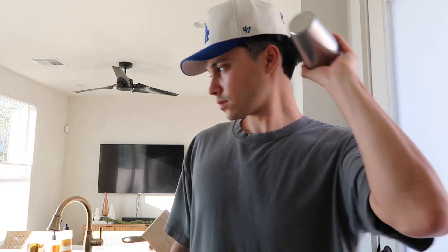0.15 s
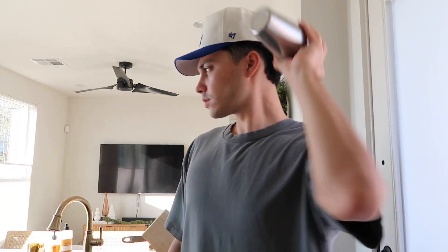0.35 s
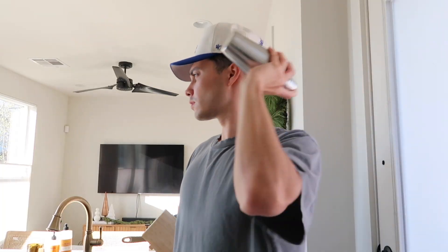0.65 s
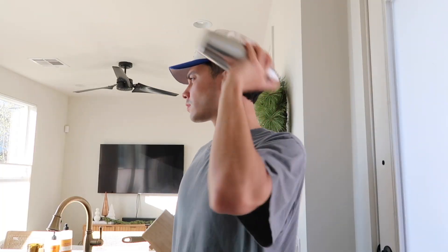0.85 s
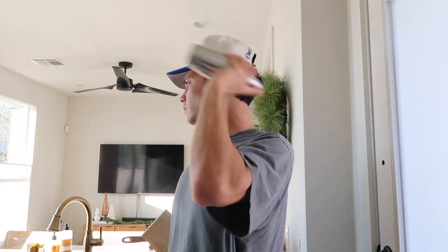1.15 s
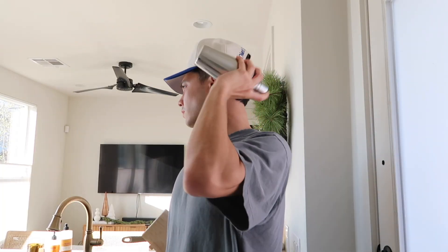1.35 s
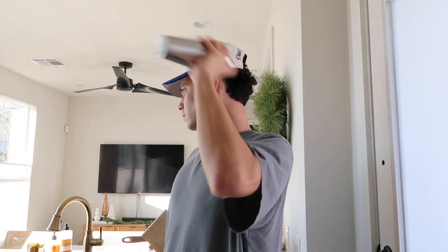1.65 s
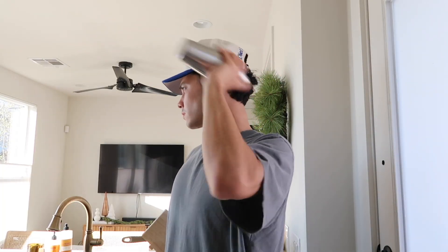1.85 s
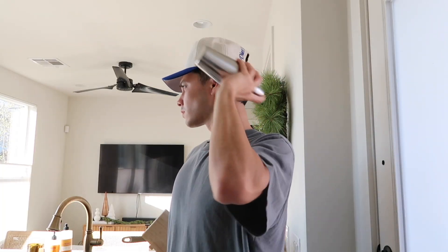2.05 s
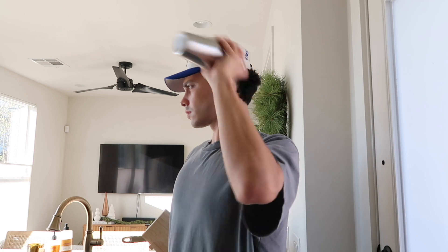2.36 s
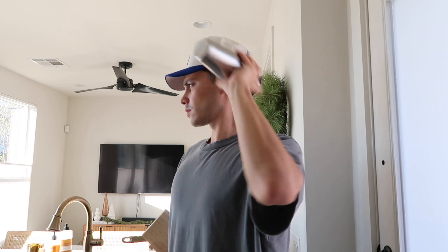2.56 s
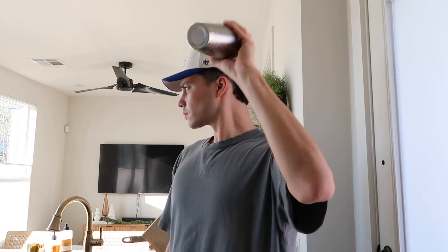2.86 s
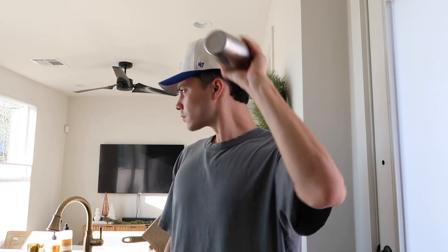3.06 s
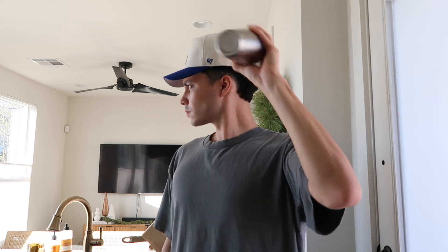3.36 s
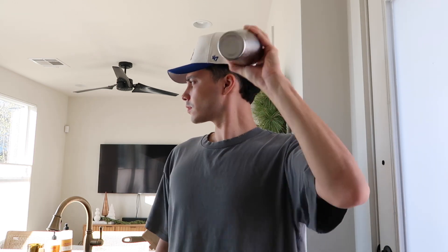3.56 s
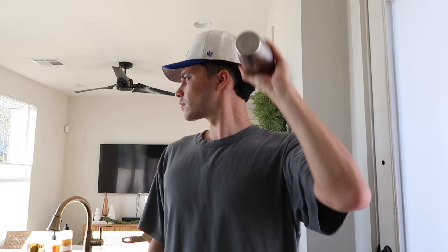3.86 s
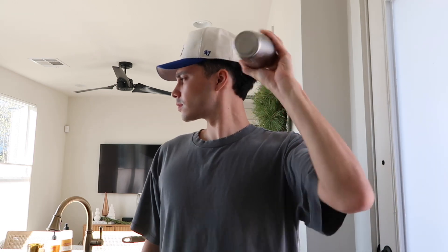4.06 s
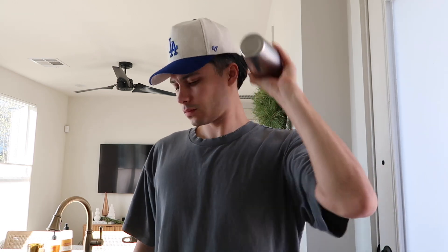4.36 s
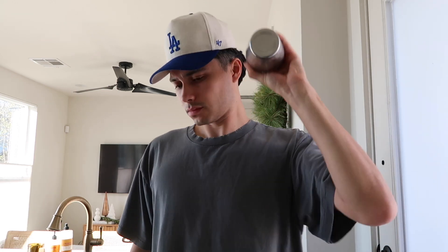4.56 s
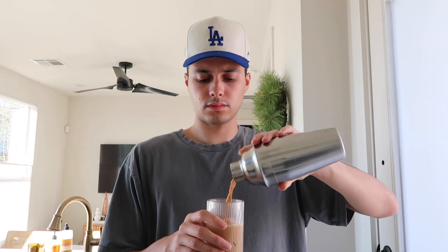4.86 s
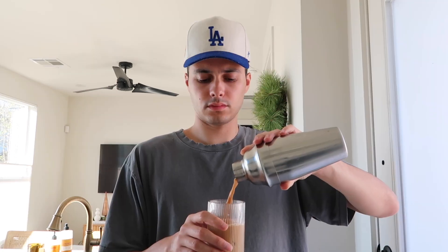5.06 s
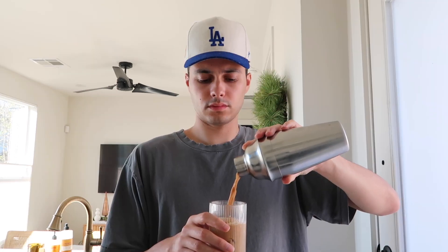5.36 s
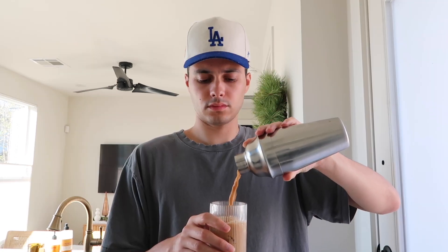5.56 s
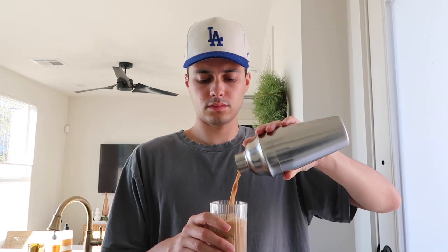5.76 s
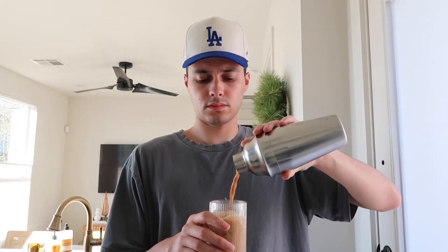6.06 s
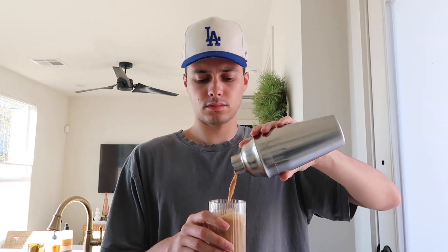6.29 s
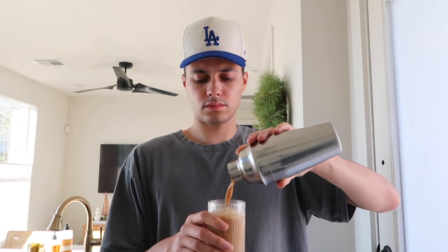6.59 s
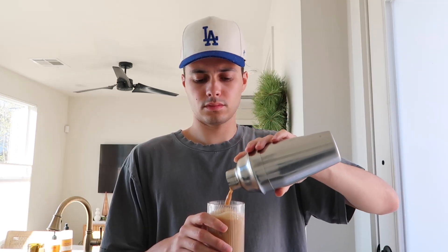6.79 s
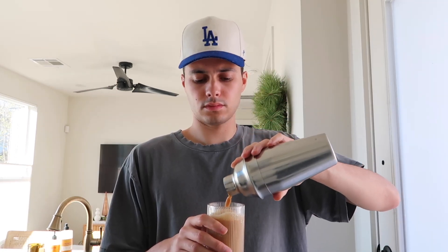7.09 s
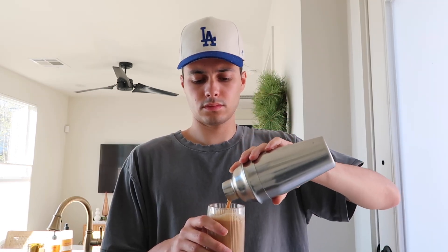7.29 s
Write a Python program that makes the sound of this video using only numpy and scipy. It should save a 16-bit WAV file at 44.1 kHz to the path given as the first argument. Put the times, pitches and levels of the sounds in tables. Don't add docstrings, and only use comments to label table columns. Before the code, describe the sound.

From 0 to about 4.67 seconds, ice cubes are shaken hard in a hand-held steel shaker close to a stereo microphone. Some eight throws a second give alternating bursts of dense, bright rattle, with sharp knocks, dry cube cracks and quick taps; the metal rings only briefly under the hand. It starts slightly gentler, is wildest around 1.5 to 2 seconds, then stays steady, with a heavy knock near 4.4. At 4.67 it cuts abruptly to a much quieter pour. A bubbly trickle runs into a glass, fullest around 6 to 6.3 seconds, while cubes shift and clink in the tilted shaker, notably at 5.1 and 6.2, with slightly longer ringing. Tiny splashes sparkle near 5.8. After 6.6 the stream thins to a dribble, with soft drips from 6.96 to 7.4. Short kitchen reflections, fan wash, low fridge hum and a very faint high whine lie behind.

```python
import sys
import numpy as np
from scipy import signal
from scipy.fft import rfft, irfft, next_fast_len
from scipy.io import wavfile
from scipy.ndimage import uniform_filter1d

SR = 44100
rng = np.random.default_rng(int(sys.argv[2]) if len(sys.argv) > 2 else 0)


def log_audio(samples):
    frames = np.atleast_2d(samples).T
    limited = np.clip(frames, -1, 1)
    pcm = np.round(limited * 32767).astype(np.int16)
    wavfile.write(sys.argv[1], SR, pcm)


def gain_from_db(level_db):
    decades = np.asarray(level_db, float) / 20
    return 10 ** decades


N = 327699
T = np.arange(N) / SR
CHANGE_S = 4.668


def shaking():
    # (frequency [Hz], density [dB per Hz])
    rattle_tone = [(130, -59), (320, -43), (420, -15.5), (687, -10), (930, -12), (1400, -15), (1740, -3),
                   (2230, -6.5), (2810, -10.5), (3660, -6), (5230, -16.5), (12500, -34.5), (15500, -39)]
    # (time [s], peak [dB], pitch [Hz], sharp tick against it [dB])
    body_knocks = [(.1236, -3.5, 2103, -13.5), (.3382, -4.5, 2130, -16.5), (.3872, -4, 2436, -33.5),
                   (.6183, -18, 1810, -17), (.8918, -25, 2300, -14.5), (.9029, -5, 2250, -22),
                   (1.1064, -1.5, 2210, -33), (1.1355, -7, 2130, -29.5), (1.3755, -7.5, 1660, -4.5),
                   (1.6168, -2.5, 1870, -30), (1.7151, -2, 1840, -9.5), (1.7362, -1.5, 1960, -19),
                   (1.8341, 2.5, 2110, -19), (2.3188, -0.5, 2270, -21), (2.5467, -8.5, 1950, -24),
                   (2.7609, 0.5, 2100, -17), (2.9812, -2, 2300, -9.5), (2.9837, -8.5, 2390, 2),
                   (3.1999, -2, 2480, -24), (3.2086, -4, 2000, -15), (3.4533, -9, 2370, -27),
                   (3.4672, -9, 2410, -29), (3.6695, -7, 1990, -21), (3.6925, -3, 2140, -29.5),
                   (3.9854, -2, 2474, -6), (4.1712, -5.5, 2680, -5.5), (4.1888, -11, 2200, -29),
                   (4.2632, -4, 2044, -14), (4.3901, 7.5, 2170, -13), (4.3934, 2, 3700, -14.5)]
    # (time [s], peak [dB], pitch [Hz], sharp tick against it [dB])
    cap_knocks = [(0.2642, -12.5, 3510, -3), (.482, -9, 3610, -30.5), (0.505, -12.5, 3300, -29.5),
                  (.7137, -2.5, 3470, -33.5), (.8808, -10, 3100, -31.5), (.998, -3.5, 3220, -6),
                  (1.0043, -5, 3810, -24.5), (1.2826, -5.5, 3420, -25), (1.4605, -8, 3500, -7.5),
                  (1.6131, -0.5, 3700, -34), (1.8434, 0, 3650, -24.5), (1.9201, -3, 4270, -24),
                  (1.936, -24, 3730, -24), (1.941, -6, 3380, -22), (2.178, -6, 3500, -30.5),
                  (2.31, -7, 3280, -6), (2.3535, -1.5, 3650, -10), (2.4054, -5.5, 3270, -28.5),
                  (2.6094, -6, 3660, -26.5), (2.758, -9.5, 1770, -14), (3.087, 0.5, 3460, -31.5),
                  (3.144, -6.5, 3860, -20), (3.279, -9, 3200, -32.5), (3.5525, -11, 3520, 0.5),
                  (3.767, -11, 2870, 3), (4.0194, -5.5, 3460, -10), (4.177, -14, 3630, -21),
                  (4.268, -6, 3270, -7), (4.5221, -10, 5240, -21), (4.6322, -22, 3550, -18.5)]
    # (time [s], peak [dB], pitch [Hz])
    cracks = [(0.0179, -13.5, 1855), (0.1385, -12.5, 2080), (0.181, -15.5, 2180), (0.3733, -16, 2210),
              (0.4905, -25, 2120), (0.637, -13, 1795), (0.6918, -12.5, 3520), (0.719, -8, 3600),
              (1.5896, 0.5, 2160), (1.709, -7, 1850), (1.8023, -1.5, 1940), (2.0277, -26.5, 2200),
              (2.0702, -6.5, 2180), (2.246, -6, 2060), (2.2707, -11, 2100), (2.3583, -24, 2240),
              (2.8404, -14.5, 1830), (2.8895, -5, 1830), (3.0079, -4.5, 2167), (3.442, -12.5, 2160),
              (3.5857, -4, 2150), (3.7324, -13, 2140), (3.8955, -6, 2610), (3.9094, -8, 1250),
              (4.155, -8, 2310), (4.4462, -10, 2000), (4.6214, -13, 3790)]
    # (time [s], peak [dB], pitch
    # [Hz])
    corner_taps = [(0.0464, -12, 3580), (0.057, -28, 3610), (0.1424, -7.5, 2250), (0.1611, -18, 1940),
                   (0.1828, -11.5, 1984), (0.185, -13, 1970), (0.243, -21, 3270), (0.2549, -17, 3550),
                   (0.3382, -22, 2140), (0.3605, -9.5, 3780), (0.3637, -13.5, 2200), (0.3742, -8.5, 2110),
                   (0.4039, -8, 3770), (0.4914, -13, 2330), (0.5186, -16, 3620), (0.597, -20.5, 1654),
                   (0.6182, -12.5, 1980), (0.6506, -12.5, 2370), (0.6702, -10, 3400), (0.6944, -13, 3500),
                   (0.719, -4.5, 3580), (0.7447, -12.5, 3370), (0.76, -14, 1870), (0.7918, -11.5, 3120),
                   (0.8153, -26.5, 2220), (0.8806, -10, 3310), (0.8911, -5, 2360), (0.9044, -20, 2030),
                   (0.927, -10.5, 1960), (0.99, -11, 3480), (1.0504, -8.5, 3460), (1.0536, -12.5, 3660),
                   (1.0592, -14, 2230), (1.098, -9.5, 2240), (1.1347, -3, 2080), (1.3146, -18, 3110),
                   (1.3388, -17, 4100), (1.3557, -13, 2024), (1.3792, -15, 2110), (1.4553, -8.5, 2180),
                   (1.462, -2, 3860), (1.5694, -12, 1740), (1.6801, -9, 3190), (1.89, -18.5, 1830),
                   (1.913, -9, 3700), (1.914, -8, 4230), (1.9354, -3, 3540), (1.9607, -26, 3520),
                   (2.0275, -7.5, 2290), (2.0292, -11.5, 2120), (2.072, -6.5, 3640), (2.162, -14, 3700),
                   (2.2536, -7.5, 3310), (2.2726, -6.5, 2130), (2.2896, -9, 2290),
                   (2.359, -9.5, 2240), (2.3634, -5, 4450), (2.4652, -16, 1790), (2.5467, -10.5, 2040),
                 (2.596, -12, 3570), (2.7169, -9, 2220), (2.737, -2.5, 2910), (2.745, -13, 1940),
                 (2.78, -7.5, 2270), (2.8043, -12, 3650), (2.8419, -8.5, 2160), (2.9205, -23.5, 1950),
                 (2.931, -11, 3460), (2.9775, -10.5, 1850), (2.9836, -3, 2193), (3.0111, -14.5, 2000),
                 (3.0159, -7, 2100), (3.0373, -12.5, 3780), (3.0541, -10.5, 2110), (3.1997, -5, 2176),
                 (3.2046, -5.5, 2150), (3.2366, -15, 2010), (3.4528, -14.5, 2310), (3.461, -19, 3470),
                 (3.5198, -17, 2020), (3.5313, -20, 3050), (3.5439, -4, 3480), (3.588, -22, 1930),
                 (3.6337, -20.5, 2400), (3.643, -14, 1990), (3.669, -6, 1973), (3.6966, -12.5, 1990),
                 (3.7143, -13.5, 2170), (3.7165, -9, 3230), (3.7341, -11.5, 2460), (3.8299, -4, 4770),
                 (3.8984, -18, 2530), (3.911, -9.5, 2090), (3.9662, -6.5, 1960), (4.0215, -2, 3363),
                 (4.17, -15, 2250), (4.1772, -7, 3630), (4.1888, -7, 2195), (4.3072, -10, 2080),
                 (4.323, -23, 1750), (4.3286, -12.5, 1970), (4.393, -3, 2060), (4.3971, -13.5, 2034),
                 (4.4313, -16.5, 2220), (4.4605, -23, 1940), (4.572, -13, 3700), (4.623, -18, 2470),
                 (4.633, -18, 3270), (4.643, -24.5, 1750), (4.657, -11, 3610)]
    # (frequency [Hz], width [Hz], level [dB])
    shell_held = [(700, 260, -7), (1750, 110, 0), (2210, 110, 2.5), (3600, 200, 0.5), (6520, 450, -12)]

    rattle = gain_from_db(-6) * grains(throw_levels(), rattle_tone, per_s=230, cycles=1.77, spread_db=1.6,
                              clack_db=3.14, low_hz=1100, high_hz=6000)
    knock_cycles = np.repeat([1.1, 1.8], [len(body_knocks), len(cap_knocks)])
    knocks = gain_from_db(-5.5) * strikes(body_knocks + cap_knocks, knock_cycles, bounce_s=0.0054, bounce_db=-12,
                                 tick_s=0.0044, tick_hz=3340, tick_width=1.857, scatter=0.47)
    crack_rows = [(*row, -2.5) for row in cracks]
    knocks = knocks + gain_from_db(-9.5) * strikes(crack_rows, 0.84, bounce_s=0.0056, bounce_db=-5.5,
                                          tick_s=0.00046, tick_hz=4530, tick_width=1.72, scatter=0.56)
    tap_rows = [(*row, -16) for row in corner_taps]
    knocks = knocks + gain_from_db(-2) * strikes(tap_rows, 0.66, bounce_s=0.004, bounce_db=-8.5,
                                        tick_s=0.000602, tick_hz=4234, tick_width=1.9, scatter=0.72)
    knocks = highpassed(knocks, 480)
    wall = gain_from_db(-2) * ring(rattle, shell_held, widen=0.6, spot_db=2.6, drift=0.02)
    wall = wall + ring(knocks, shell_held, widen=0.3, spot_db=1.1, drift=0.02)
    return heard(rattle + knocks + wall, wet_db=-7.5, wander=1.94, fading_db=2.56)


def throw_levels():
    # (time [s], rattle level [dB])
    tumble = [
        (0, -30.5),
        (1.0, -26.5),
        (1.5, -19.5),
        (2.1, -25),
        (3.3, -25),
        (4.1, -26),
        (4.66, -26),
    ]
    # (start [s], rattle level [dB], length [s])
    ice_throws = [(0.125, -27.5, 0.087), (0.379, -21.5, 0.024), (0.61, -21, 0.061), (0.785, -18.5, 0.0062),
                  (0.998, -23.5, 0.012), (1.201, -19, 0.078), (1.462, -15.5, 0.038), (1.707, -16, 0.023),
                  (1.912, -19, 0.0312), (2.168, -19.5, 0.0141), (2.358, -19, 0.004), (2.536, -20.5, 0.0387),
                  (2.737, -18.5, 0.047), (2.98, -20, 0.0052), (3.209, -17, 0.013), (3.454, -23, 0.035),
                  (3.66, -21.5, 0.089), (3.91, -13.5, 0.0074), (4.023, -19, 0.055), (4.256, -20, 0.0697),
                  (4.519, -18.5, 0.013),
                  (0.252, -26, 0.0065), (0.488, -22.5, 0.01), (.716, -22, 0.029), (0.889, -22, 0.039),
            (1.121, -17.5, 0.047), (1.328, -16.5, 0.062), (1.591, -16, 0.0108), (1.776, -17, 0.076),
            (2.024, -17.5, 0.016), (2.26, -19.5, 0.058), (2.418, -20, 0.0141), (2.621, -15, 0.032),
            (2.839, -15.5, 0.022), (3.083, -21.5, 0.0204), (3.297, -22.5, 0.022), (3.525, -26, 0.08),
            (3.797, -17, 0.021), (3.966, -25, 0.076), (4.158, -21, 0.0444), (4.386, -18.5, 0.0043),
            (4.634, -23, 0.051)]

    swell_s, settle_s = 0.0043, 0.0098
    power = three_levels(tumble, -17.5, -11) ** 2
    for start, rattle_db, length in ice_throws:
        near = slice(max(round((start - .05) * SR), 0), round((start + .3) * SR))
        lag = T[near] - start
        swell = (np.minimum(lag, 0) / swell_s) ** 2
        settle = np.maximum(lag - length, 0) / settle_s
        slosh_rattle_fizz_db = [[rattle_db - 15.5], [rattle_db], [rattle_db - 11]]
        power[:, near] += gain_from_db(slosh_rattle_fizz_db) ** 2 * np.exp(-swell - settle)
    return np.sqrt(power)


def strikes(rows, cycles, bounce_s, bounce_db, tick_s, tick_hz, tick_width, scatter, rise=0.048):
    notes, ticks = np.zeros((2, N + SR))
    scrapes = rng.standard_normal((len(rows), 900))
    chatter = rng.random((len(rows), 4, 3))
    age = np.arange(900) / SR / tick_s
    scrape_shape = np.minimum(age / rise, 1) * np.exp(-age)
    each_cycles = cycles * np.ones(len(rows))
    for (s, peak_db, hz, tick_db), count, scrape, bounces in zip(rows, each_cycles, scrapes, chatter):
        note, lead = wavelet(hz, count)
        at = round(s * SR) - lead
        notes[at:at + len(note)] += gain_from_db(peak_db) * note
        ticks[at:at + 900] += gain_from_db(peak_db + tick_db) * scrape * scrape_shape
        for late, spot, weak in bounces:
            note = wavelet(hz * np.exp(scatter * (spot - .4)), count)[0]
            after = at + round(late * bounce_s * SR)
            notes[after:after + len(note)] += gain_from_db(peak_db + bounce_db - 9.9 * weak) * note
    band = [tick_hz / tick_width, min(tick_hz * tick_width, .4 * SR)]
    bright = signal.butter(2, band, "bandpass", fs=SR, output="sos")
    return (notes + 2 * signal.sosfilt(bright, ticks))[:N]


def grains(levels, tone, per_s, cycles, spread_db, clack_db, low_hz, high_hz):
    bands = np.zeros((3, N))
    clacks = gain_from_db(clack_db * np.minimum(rng.exponential(1, N // 40 + 1), 2.8))
    clacks = np.repeat(clacks, 40)[:N]
    for hz in np.geomspace(340, 14500, num=36):
        size = gain_from_db(spread_db * np.minimum(rng.exponential(1, N), 3.2)) * rng.choice([-1., 1.], N)
        happens = rng.random(N) < per_s * (hz / 2000) ** 1.1 / SR
        burst = evened(signal.oaconvolve(clacks * size * happens, wavelet(hz, cycles)[0])[:N])
        band = int(hz > low_hz) + int(hz > high_hz)
        bands[band] += gain_from_db(read(tone, hz)) * np.sqrt(hz) * burst
    return sum(gain * evened(band) for gain, band in zip(levels, bands))


def three_levels(rows, low_db, high_db):
    middle_db = np.interp(T, *np.transpose(rows))
    return gain_from_db([middle_db + low_db, middle_db, middle_db + high_db])


def ring(x, modes, widen, spot_db, drift):
    out = 0
    for hz, width, mode_db in modes:
        spot, load = (slow_steps() for _ in range(2))
        carrier = np.exp(2j * np.pi * np.cumsum(hz * (1 + drift * load)) / SR)
        decay = np.exp(-np.pi * width * widen / SR)
        driven = x * gain_from_db(mode_db + spot_db * spot) / carrier
        out = out + 2 * (carrier * signal.lfilter([1 - decay], [1, -decay], driven)).real
    return out


def slow_steps():
    return np.repeat(evened(uniform_filter1d(rng.standard_normal(N // 200 + 1), size=8)), 200)[:N]


def pouring():
    # (time [s], level [dB])
    trickle = [
        (4.68, -57.5),
        (5.4, -54),
        (5.7, -53.5),
        (6.0, -53),
        (6.3, -53),
        (6.55, -55),
        (6.75, -59.5),
        (7.0, -62),
        (7.43, -63.5),
    ]
    # (frequency [Hz], density [dB per Hz])
    trickle_tone = [(380, -39), (650, 3), (1130, -4), (1700, 1.5), (2600, -8.5), (5480, -24), (14000, -33)]
    # (time [s], peak [dB], pitch [Hz], sharp tick against it [dB])
    clinks = [(4.7648, -29, 1304, -15), (4.9894, -22, 2540, -30), (5.0473, -27, 1460, -12),
              (5.1323, -9.5, 1555, -4.5), (5.2273, -21.5, 1590, -12.5), (5.3101, -27, 1490, -4.5),
              (5.3602, -22, 1220, -34), (5.4481, -21.5, 1551, -31), (5.5324, -25, 2340, -14),
              (5.5844, -25, 1593, -12), (5.7045, -17, 1670, -13), (5.7863, -22, 1610, -16),
              (5.8138, -20.5, 1445, -5), (5.8373, -15, 2643, -17), (5.9329, -25.5, 1330, -22),
              (6.0318, -23.5, 1905, -8.5), (6.0965, -25, 1636, -14), (6.163, -7.5, 1891, -42),
              (6.1864, -26, 1780, -31.5), (6.3277, -22.5, 2150, -13), (6.3665, -21.5, 2915, -25.5),
              (6.4028, -19.5, 1856, -13.5), (6.4442, -18.5, 2367, -27), (6.4842, -21, 2110, -35),
              (6.5298, -23, 2650, -33.5), (6.5567, -23.5, 2380, -36), (6.6861, -20.5, 2245, -37.5),
              (5.1401, -32, 1470, -5), (5.9422, -22, 1680, -12), (6.6103, -29, 2460, -25)]
    # (time [s], peak [dB], pitch [Hz])
    nudges = [(4.687, -30.5, 2340), (4.801, -35, 1520), (4.839, -36, 1496), (6.9605, -39, 1700),
              (5.6977, -27, 1700), (4.9584, -38, 1270), (4.99, -29, 2320), (5.066, -34, 1520),
              (5.0808, -35.5, 1530), (5.1094, -35.5, 1520), (5.168, -31, 1627), (5.3606, -35, 1250),
              (5.3697, -36, 1590), (5.3938, -41, 3470), (5.418, -39, 1490), (5.427, -38.5, 1700),
              (5.438, -39, 1560), (5.6285, -46, 1530), (5.7475, -32, 1625), (5.826, -32, 1710),
              (5.9682, -33, 1780), (6.0808, -33.5, 2290), (6.138, -35.5, 1700), (6.1873, -30, 1776),
              (6.2081, -35, 1810), (6.239, -32, 1990), (6.246, -40, 1730), (6.275, -34, 2270),
              (6.336, -30, 1716), (6.3551, -34, 1740), (6.4259, -35.5, 1780), (6.5085, -33, 2290),
              (6.5173, -36, 1670), (6.5665, -33, 1730), (6.5924, -39.5, 2280), (6.5995, -39.5, 2220),
              (6.6163, -36.5, 2630), (6.668, -35, 2290), (6.6915, -28, 2280), (6.7354, -38, 2370),
              (6.7543, -41, 1690), (6.8017, -45.5, 2294), (6.8372, -39, 2330)]
    # (frequency [Hz], width [Hz], level [dB])
    shell_tilted = [(1260, 60, 3), (1490, 57, 0.5), (1730, 95, 0), (2240, 64, 1), (3460, 81, 6)]
    # (frequency [Hz], width [Hz], level [dB])
    shell_emptied = [(1250, 56, 6), (1520, 76, 1), (1750, 67, -1), (2043, 37, -12.5), (2250, 65, 3),
                     (3030, 120, 3.5), (3460, 80, -10), (4980, 45, -2)]

    gurgle_db = 4 - 2.5 * (T - CHANGE_S)
    liquid = grains(three_levels(trickle, gurgle_db, -11.5), trickle_tone, per_s=520, cycles=2.61,
                    spread_db=2.5, clack_db=2, low_hz=1900, high_hz=4000)
    glugs = uniform_filter1d(rng.standard_normal(N), size=900)
    glugs = evened(uniform_filter1d(glugs, size=500))
    liquid = liquid * gain_from_db(2.5 * glugs - 1.35) + splashes()
    cubes = gain_from_db(-10.5) * strikes(clinks, 1.677, bounce_s=0.026, bounce_db=-6.5, tick_s=0.0074,
                                 tick_hz=2240, tick_width=2.9, scatter=0.34, rise=0.58)
    nudge_rows = [(*row, -24) for row in nudges]
    cubes = cubes + gain_from_db(-5.5) * strikes(nudge_rows, 2.55, bounce_s=0.013, bounce_db=-14.5, tick_s=0.004,
                                        tick_hz=2400, tick_width=1.01, scatter=0.13)
    cubes = highpassed(cubes, 650)
    poured = T > CHANGE_S
    wet_ice = (gain_from_db(-2.5) * liquid + cubes) * poured
    drained = np.interp(T, [5.79, 6.13], [0, np.pi / 2])
    wall = ring(wet_ice * np.cos(drained), shell_tilted, widen=0.84, spot_db=2.8, drift=0.01)
    wall = wall + ring(wet_ice * np.sin(drained), shell_emptied, widen=0.81, spot_db=2.8, drift=0.01)
    close = (liquid + cubes) * poured + drips() + gain_from_db(1) * wall
    return heard(close, wet_db=-5, wander=1.71, fading_db=0.69)


def splashes():
    # (time [s], peak [dB], pitch [Hz])
    splash_rows = [(5.8, -38, 3280), (5.745, -49, 11000), (5.814, -47, 12000), (4.8, -40, 4160),
                   (4.9, -49.5, 3510), (5.8107, -38, 4933), (5.85, -43, 4950), (5.955, -51, 5900),
                   (4.885, -51, 5000), (4.7, -47, 6300), (5.762, -50, 7200), (5.1, -42, 9000),
                   (6.5, -48, 4500), (6.5, -46, 3153), (6.099, -44, 6000), (6.326, -48, 5350),
                   (6.579, -47, 4020)]
    out = np.zeros(N + SR)
    for (s, peak_db, hz), bubbles in zip(splash_rows, rng.random((len(splash_rows), 10, 2))):
        for late, size in bubbles:
            pop = wavelet(hz * (1 + 0.19 * (size - .5)), 5.9)[0]
            at = round((s + 0.022 * late ** 2) * SR)
            out[at:at + len(pop)] += gain_from_db(peak_db + 0.5 - 10 * late) * pop
    return out[:N]


def drips():
    # (time [s], peak [dB])
    drip_rows = [
        (6.9591, -37),
        (7.0574, -45.5),
        (7.1232, -41),
        (7.221, -48),
        (7.3721, -36.5),
    ]
    out = np.zeros(N + SR)
    for (s, peak_db), size in zip(drip_rows, rng.random(len(drip_rows))):
        pop = wavelet(2251 * (1 + 0.045 * (size - .5)), 4.47)[0]
        at = round(s * SR)
        out[at:at + len(pop)] += gain_from_db(peak_db - 2.5) * pop
    return out[:N]


def heard(x, wet_db, wander, fading_db):
    # (frequency [Hz], level [dB])
    port_side = [(60, -21), (150, -5), (380, -15), (950, -40), (2380, -24), (5980, -0.5), (15000, 7)]
    in_room = x + gain_from_db(wet_db) * signal.fftconvolve(x, room_tail())[:N]
    hz, _, z = signal.stft(in_room, SR, nperseg=256, noverlap=192)
    patches = uniform_filter1d(rng.standard_normal((z.shape[1], z.shape[0], 2)).T, size=6, axis=1)
    turn, fade = (evened(p) for p in uniform_filter1d(patches, size=20, axis=2))
    fading = gain_from_db(fading_db * fade * np.minimum(hz / 9000, 1.2)[:, None] ** 2)
    both = np.array([z * fading, z * np.exp(1j * wander * turn)])
    mid, turned = signal.istft(both, SR, nperseg=256, noverlap=192)[1][:, :N]
    side = shaped(turned, port_side, -np.pi / 2)
    return np.array([mid, side - 0.022 * mid])


def room_tail():
    # (frequency [Hz], time to fall 60 dB [s])
    room_t60 = [(300, 0.466), (2000, 0.226), (8000, 0.289), (15000, 0.52)]
    taps = np.zeros(SR // 2)
    at = np.arange(140, SR // 2 - 20, 20)
    taps[at + rng.integers(0, 20, len(at))] = rng.choice([-1., 1.], len(at))
    hz, t, z = signal.stft(taps, SR, nperseg=256)
    dying = gain_from_db(-60 * t / read(room_t60, hz)[:, None])
    tail = signal.istft(z * dying, SR, nperseg=256)[1]
    return tail / np.linalg.norm(tail)


def air():
    # (frequency [Hz], density [dB per Hz])
    air_tone = [(14, -25.5), (32, -6), (50, 1.5), (72, -5.5), (100, 2), (160, -6.5), (255, -3), (400, -10),
                (700, -14.5), (1300, -25.5), (2300, -35.5), (4500, -29), (11000, -44), (15700, -39.5)]
    # (time [s], level [dB])
    air_db = [
        [(0.0, -53), (1.29, -46.5), (4.62, -47.5)],
        [(4.7, -38.5), (5.2, -37), (5.6, -40), (7.43, -40)],
    ]
    # (frequency [Hz], level [dB])
    air_side = [(60, -35), (120, -11), (240, -5.5), (480, -4), (950, 1.5), (1890, 5.5), (3770, 6.5),
                (7520, -5), (15000, 7)]
    # (frequency [Hz], level [dB])
    hum = [(96.9, -65), (193.8, -60)]
    # (frequency [Hz], level [dB])
    whine = [(11779, -101), (13006, -75)]

    mid, side = (shaped(rng.standard_normal(N), air_tone) for _ in range(2))
    wash = np.array([mid, shaped(side, air_side)]) / np.std(mid)
    before_db, after_db = (np.interp(T, *np.transpose(rows)) for rows in air_db)
    wash *= gain_from_db(np.where(T < CHANGE_S, before_db, after_db) - 9.5)
    gust = evened(shaped(rng.standard_normal(N), [(60, -34), (100, 10), (220, 3), (400, -44.5)]))
    wash[0] += gust * gain_from_db(-50 - 8.5 * abs(T - CHANGE_S)) * (T > CHANGE_S)
    ducked = gain_from_db(-7 * (T < CHANGE_S))
    for hz, hum_db in hum:
        waver = evened(uniform_filter1d(rng.standard_normal(N), 6000))
        tone = np.sin(2 * np.pi * hz * T + 0.29 * waver)
        wash[0] += np.sqrt(2) * gain_from_db(hum_db + waver[::-1]) * ducked * tone
    flutter = 1 + .7 * np.sin(2 * np.pi * 30 * T)
    for hz, whine_db in whine:
        tone = flutter * np.sin(2 * np.pi * hz * T)
        wash += np.sqrt(2) * gain_from_db([[whine_db], [whine_db - 3.5]]) * ducked * tone
    return wash


def evened(x):
    return x / np.sqrt(np.mean(x ** 2) + 1e-20)


def highpassed(x, hz):
    return signal.sosfilt(signal.butter(2, hz, "highpass", fs=SR, output="sos"), x)


def read(points, hz):
    f, value = np.transpose(points)
    return np.interp(np.log(hz + 1), np.log(f + 1), value)


def shaped(x, points, turn=0):
    size = next_fast_len(N)
    gain = gain_from_db(read(points, np.fft.rfftfreq(size, 1 / SR)))
    return irfft(rfft(x, size) * gain * np.exp(1j * turn), size)[:N]


def wavelet(hz, cycles):
    u = np.arange(int(7 * cycles * SR / hz) + 8) * hz / SR / cycles
    return u * np.exp(1 - u) * np.cos(2 * np.pi * (u - 1) * cycles), round(cycles * SR / hz)


def scene():
    shaking_fade = np.clip((CHANGE_S - T) / 0.0087, 0, 1)
    mid, side = shaking_fade * shaking() + pouring() + air()
    return np.array([mid + side, mid - side])


def band_limit(x):
    return signal.sosfilt(signal.butter(12, 15700, fs=SR, output="sos"), x)


def record(dry):
    thump_band = signal.butter(2, [140, 500], "bandpass", fs=SR, output="sos")
    thump = signal.sosfilt(thump_band, dry.mean(0) ** 2)
    pushed = np.clip(dry + 0.09 * thump, -1, 1)
    limited = signal.oaconvolve(pushed, signal.firwin(255, 15700, fs=SR)[None], "same")
    return band_limit(limited)


dry = scene()
out = record(dry)
log_audio(out)
```